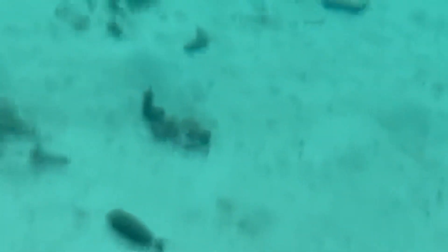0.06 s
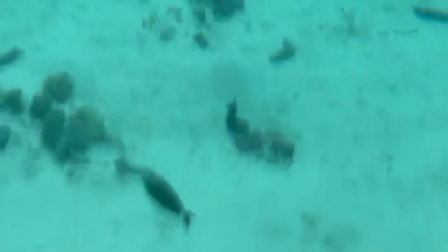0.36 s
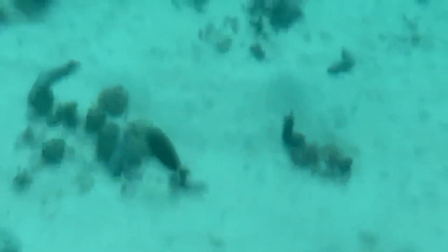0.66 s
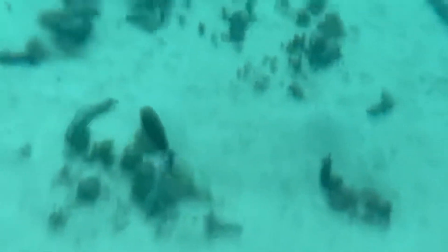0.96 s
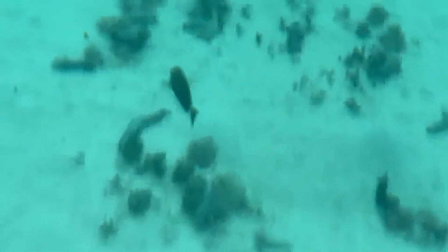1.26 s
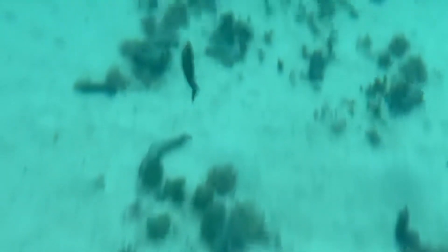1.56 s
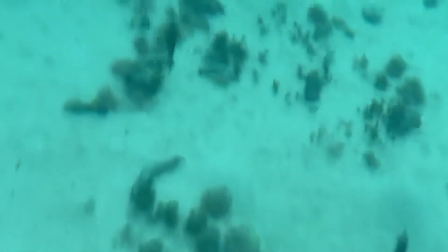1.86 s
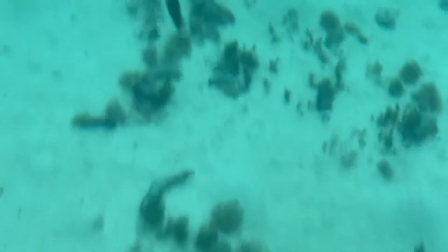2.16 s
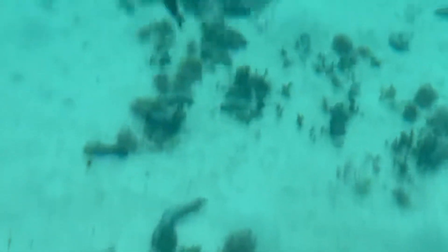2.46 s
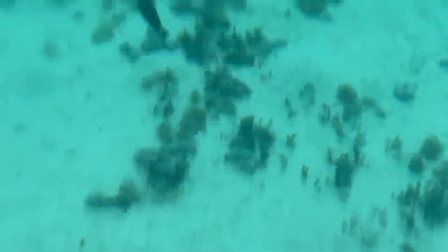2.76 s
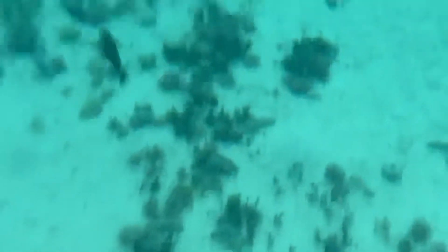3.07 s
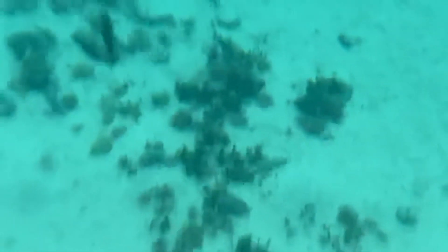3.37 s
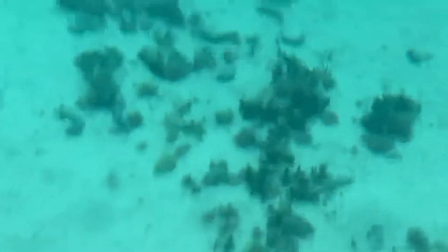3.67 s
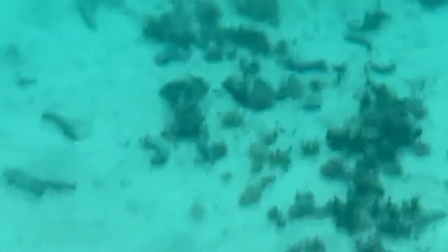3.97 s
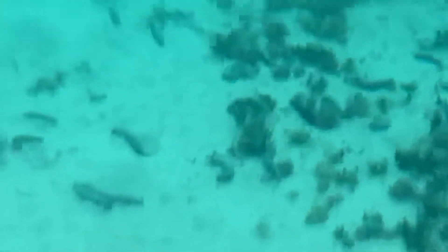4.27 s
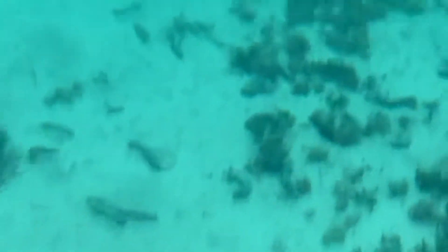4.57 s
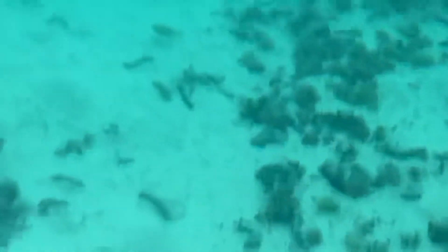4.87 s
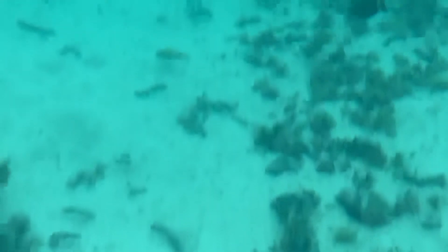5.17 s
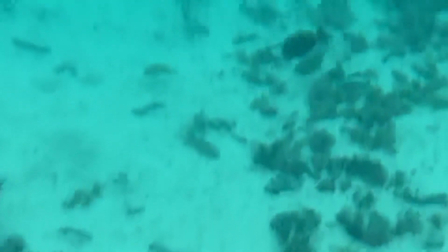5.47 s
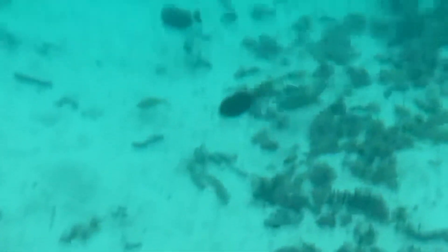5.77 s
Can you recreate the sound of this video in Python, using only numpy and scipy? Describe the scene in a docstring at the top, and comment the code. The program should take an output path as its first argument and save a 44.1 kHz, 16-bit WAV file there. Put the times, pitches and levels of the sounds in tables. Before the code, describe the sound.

Muffled underwater rumble swells twice against a camera case, with sharp little clicks and low gulps of air.

```python
"""Sea water rumbles against a watertight camera case and churns in two long swells.
The case is held just under the surface, above a reef. The surface fizzes faintly and small bubbles ring.
Sharp snaps, as of shrimp and bursting bubbles, tick on the case, and pockets of air throb and gulp."""
import sys
import numpy as np
from scipy import signal
from scipy.fft import rfft, irfft, next_fast_len
from scipy.io import wavfile
from scipy.ndimage import uniform_filter1d, map_coordinates

SR = 44100
rng = np.random.default_rng(int(sys.argv[2]) if len(sys.argv) > 2 else 0)


def bounce(signal):
    """Save signal as a 16-bit WAV file at the path given by the first command-line argument."""
    frames = np.transpose(np.atleast_2d(signal))
    limited = np.clip(frames, -1, 1)
    pcm = np.round(limited * 32767).astype(np.int16)
    wavfile.write(sys.argv[1], SR, pcm)


N = 261513
T = np.arange(N) / SR

# how strongly water flows along the case; 0 dB is a full swell (time [s], level [dB])
FLOW_LEVEL = [(0, -14), (.8, -12), (1.05, -17), (1.25, -13.5), (1.62, -17.5), (1.88, 0), (2.05, -1),
              (2.8, -.5), (3.12, -2), (3.35, -4.5), (3.7, -11), (4.15, -12.5), (4.7, -6.5), (5.03, -11.5),
              (5.35, -4.5), (5.65, 0), (5.93, 0)]
# how loud the deep rumble is (time [s], level [dB])
RUMBLE_LEVEL = [(0, -27), (1.0, -27), (1.3, -29.5), (2.0, -24), (3.0, -25), (3.4, -29.5), (4.4, -23.5),
                (5.35, -32.5), (5.65, -23.5), (5.93, -31.5)]
# how hard the water bubbles (time [s], level [dB])
BUBBLING_LEVEL = [(0, -72.0), (0.8, -63.5), (1.35, -78.0), (1.65, -74.5), (2.0, -66.5), (2.6, -69.5),
                  (3.5, -59.5), (3.75, -68), (4.65, -59), (5.05, -65.5), (5.45, -64), (5.93, -63)]
# brief swishes of the broken surface (time [s], hold [s], level [dB])
SURFACE_SWISHES = [(0, .05, -78), (0.205, .08, -78.5), (0.343, .04, -77), (.68, .15, -76.5),
                   (1.06, .22, -82), (1.5, .18, -81), (1.949, 0.092, -75), (2.135, .07, -77.5),
                   (2.722, .33, -79), (3.165, .2, -73.5), (3.401, .17, -80.5), (4.022, .13, -82.5),
                   (4.369, .05, -83), (4.53, .24, -73), (4.961, .13, -81), (5.592, .14, -77),
                   (5.878, .06, -71.5)]
# the nearest snaps (time [s], crack level [dB], pitch [Hz], knock level above the ring [dB])
NEAR_SNAPS = [(0.0341, -42.5, 5385, -1), (0.2145, -47.5, 4000, 7), (0.3441, -43, 2350, 12.5),
              (0.5517, -46.5, 3850, 12.5), (0.8188, -45, 5160, 3), (0.9315, -44.5, 3850, 10),
              (1.067, -44.5, 2540, -12), (1.1451, -37, 2215, 10), (1.1784, -53, 2400, 1),
              (1.6305, -41, 4456, -3), (1.6413, -41, 4960, 4), (1.6534, -37.5, 5430, 1),
              (1.6834, -44.5, 3430, 10), (1.949, -37.5, 2906, 4.5), (2.023, -38, 5140, 4),
              (2.2627, -49.5, 2230, 9), (2.5236, -45, 5980, 7), (2.592, -43, 3610, 0),
              (2.6208, -38.5, 3090, 0), (2.6351, -39, 1850, 0.5), (2.7576, -46.5, 3200, 3),
              (2.88, -41.5, 4860, 10), (2.9177, -38, 1810, -5), (3.045, -46, 2200, 8),
              (3.1301, -43, 3690, 2), (3.2998, -33.5, 3570, 12.5), (3.4047, -45.5, 4010, 6),
              (3.4222, -42.5, 5880, -1.5), (3.4876, -37, 1880, 1), (4.023, -38.5, 1780, -0.5),
              (4.2151, -39, 1710, 14), (4.6408, -39, 1905, -3), (4.812, -36, 5800, 0.5),
              (4.9663, -48, 1650, 1), (4.9805, -42.5, 1670, 17), (5.0469, -49, 2440, -4.5),
              (5.229, -47, 1630, 19), (5.594, -39, 3140, 0), (5.673, -39, 5830, 0)]
# notes the case rings at (pitch [Hz], level [dB], time to fade 60 dB [s], right side's lag [radians])
CASE_NOTES = [(537, -10, 0.012, 0.35), (1050, -0.5, 0.0084, 1.8), (1410, -6, 0.016, 4.3),
              (1820, -5, 0.011, 4.8), (2290, -4.5, 0.012, 5.2)]
# the clearest pockets and bubbles of air (time [s], peak level [dB], settled pitch [Hz], life [s])
AIR_POCKETS = [(0.345, -20.5, 199, 0.0084), (0.349, -8.5, 88, 0.012), (0.593, -14, 66.4, 0.042),
               (0.77, -7, 73, 0.017), (0.806, -12.5, 73, 0.011), (0.818, -57, 873, .022),
               (0.918, -8, 50, 0.026), (1.149, -8, 113.2, 0.014), (1.859, -13.5, 111, 0.068),
               (2.189, -12.5, 74, 0.044), (2.807, -5.5, 74.6, .018), (3.168, -1, 135.3, 0.035),
               (3.178, -26.5, 375, 0.022), (3.19, -11.5, 134, 0.15), (3.225, -31.5, 346, .08),
               (3.341, -54, 1670, 0.014), (3.361, -12, 160, 0.076), (3.574, -54.5, 923, .018),
               (3.835, -54, 865, 0.024), (4.367, -8, 103, 0.026), (4.506, -24, 255, 0.029),
               (4.512, -6.5, 132, 0.013), (4.519, -12, 87.8, .05), (4.582, -36, 370, 0.02),
               (4.593, -25.5, 265.8, 0.067), (4.678, -3, 157, 0.036), (4.713, -6, 154.5, 0.048),
               (5.059, -11, 150.4, 0.017), (5.128, -11.5, 112.8, 0.058), (5.346, -13.5, 127, 0.052),
               (5.359, -25, 258.6, 0.029)]

# the tone of each sound, from bass to treble (frequency [Hz], level [dB])
RUMBLE_TONE = [(15, -35.5), (28, -18), (43, -2.5), (65, -0.5), (90, -7.5), (120, -16), (200, -28),
               (300, -42), (600, -90.5)]  # water pressing on the case
CHURN_TONE = [(50, -25.5), (90, -15.5), (120, -6), (152, -0.5), (185, -4.5), (225, -9.5), (270, -21.5),
              (330, -28.5), (410, -45), (600, -56), (1200, -100)]  # churning water
HUM_TONE = [(300, -32.5), (420, -21), (475, 3.5), (525, 0.5), (580, 0.5), (625, -5.5), (690, -20),
            (900, -33), (1300, -61)]  # air inside the case
WALL_TONE = [(600, -22.5), (800, -7.5), (1050, -0.5), (1230, 6), (1350, -6), (1480, 3), (1650, -14),
             (2400, -22.5), (4000, -42)]  # rocking walls
WASH_TONE = [(400, -25), (650, 0.5), (900, -1), (1050, -12.5), (1500, -18.5), (3000, -46)]  # water around the bubbles
FIZZ_TONE = [(700, -17), (1500, -5.5), (2300, -2.5), (3000, -6), (5000, -6.5), (6300, -10.5), (7300, -17),
             (10000, -12.5), (11800, -21.5), (13000, -15.5), (16000, -22)]  # the broken surface
CRACK_TONE = [(500, -5.5), (1500, 0.5), (2900, -4), (3700, 2), (5500, 0), (7300, -8.5), (9500, 0),
              (11800, -12), (13000, -3.5), (16000, -14)]  # the crack of a snap
BUZZ_TONE = [(250, -52.5), (400, -3.5), (520, -7), (690, 11), (900, -2), (1180, -9), (1330, -21),
             (2000, -46)]  # a wall hitting its stops


def amp(db):
    """Decibels to gain."""
    return 10 ** (np.asarray(db) / 20)


def unit(x):
    """Scale to an average (rms) level of 1."""
    return x / np.sqrt(np.mean(x ** 2) + 1e-20)


def curves(rows):
    """One value per sample for each column after the time."""
    s, *cols = np.transpose(rows)
    return [np.interp(T, s, c) for c in cols]


def wobble(rate):
    """A smooth random curve through rate points a second."""
    return map_coordinates(rng.standard_normal(int(N * rate / SR) + 4), [T * rate])


def filtered(x, response):
    """Scale and shift each frequency in x as response says."""
    m = next_fast_len(N + SR // 2)
    return irfft(rfft(x, m) * response(np.fft.rfftfreq(m, 1 / SR)), m)[..., :N]


def coloured(x, points):
    """Shape the bass and treble of x with a tone table."""
    f, db = np.transpose(points)
    return filtered(x, lambda hz: amp(np.interp(np.log(hz + 1), np.log(f), db)))


def noise(points):
    """Noise of level 1, shaped by a tone table."""
    return unit(coloured(rng.standard_normal(N), points))


def even(x, span):
    """Noise with its level evened out over span seconds."""
    return unit(x / np.sqrt(np.abs(uniform_filter1d(x ** 2, int(span * SR) + 1)) + 1e-6))


def ports(x, right_db, lag):
    """One sound at two microphone openings: the right is right_db louder and lag radians behind."""
    turn = np.exp(.5j * lag)
    return np.array([filtered(x, lambda hz: turn) * amp(-right_db / 2),
                     filtered(x, lambda hz: 1 / turn) * amp(right_db / 2)])


def add(track, s, sound):
    """Mix a sound in at time s."""
    part = track[..., max(0, round(s * SR)):][..., :sound.shape[-1]]
    part += sound[..., :part.shape[-1]]


def water():
    """Flow presses on the case; as it churns, the air inside hums and the walls rock the microphones."""
    flow_db, = curves(FLOW_LEVEL)
    rumble_db, = curves(RUMBLE_LEVEL)
    rumble = amp(rumble_db + 2.5 * wobble(9)) * even(noise(RUMBLE_TONE), span=0.11)
    churn = amp(-15.5 + 0.99 * flow_db + 2.3 * wobble(14)) * even(noise(CHURN_TONE), span=.1)
    case_gain = amp(-46 + 1.18 * flow_db + 0.97 * wobble(8.3))
    # the hollow hum comes forward as the churning grows
    hum = case_gain * amp(0.14 * (flow_db - np.mean(flow_db))) * even(noise(HUM_TONE), span=0.26)
    walls = case_gain * amp(-13.5) * noise(WALL_TONE)
    return (ports(rumble, right_db=0.66, lag=-.08) + ports(churn, right_db=3.5, lag=0.051)
            + ports(hum, right_db=9.0, lag=1.0) + ports(walls, right_db=-2, lag=2.54))


def swish_level(calm_db=-88, rise_s=0.023, fall_s=0.024):
    """How hard the surface fizzes, in dB: each swish rises quickly, holds and dies back to calm."""
    power = amp(calm_db) ** 2
    for start, hold, db in SURFACE_SWISHES:
        rise = np.clip((T - start) / rise_s, 0, 1)
        fall = np.exp(-np.maximum(T - start - hold, 0) / fall_s)
        power = power + (amp(db) * rise * fall) ** 2
    return 10 * np.log10(power)


def bubbles(count, hz, octaves, cycles):
    """Bubbles ring at random times: each is a fading tone that rises a little in pitch."""
    out, t = np.zeros(N), np.arange(SR // 12) / SR
    for when, pitch, strength in rng.random((count, 3)):
        bubble_hz = hz * 2 ** (octaves * (2 * pitch - 1))
        age = t * bubble_hz / cycles
        shape = (1 - np.exp(-4 * age)) * np.exp(-age)
        glide = 1 + 0.0067 * np.minimum(age, 4)
        add(out, when * N / SR, amp(20 * strength) * shape * np.sin(2 * np.pi * bubble_hz * t * glide))
    return unit(out)


def froth(fizz_db):
    """Bubbles of three sizes ring in a soft wash of water, and the broken surface fizzes."""
    bubble_db = curves(BUBBLING_LEVEL)[0] + 1.3 * wobble(14)
    wash = amp(bubble_db + 1.5) * noise(WASH_TONE)
    large = amp(bubble_db + 9.0) * bubbles(count=110, hz=337, octaves=.35, cycles=2.8)
    medium = amp(bubble_db - 1.0) * bubbles(count=260, hz=803, octaves=0.33, cycles=7.6)
    # the smallest bubbles are loudest when the water both bubbles and fizzes
    small = amp((bubble_db + fizz_db) / 2 - 4) * bubbles(count=320, hz=2060, octaves=.3, cycles=7.4)
    flutter_db = 2.0 * wobble(60) + 2.6 * wobble(700)
    fizz = amp(fizz_db + 8.0 + flutter_db) * np.array([noise(FIZZ_TONE), noise(FIZZ_TONE)])
    return (ports(wash + medium, right_db=1.0, lag=1.8) + ports(large, right_db=6.5, lag=.3)
            + ports(small, right_db=0, lag=-0.86) + fizz)


def case_ring(t):
    """A struck case rings with a few short notes, a little different on every hit."""
    ring = 0
    for hz, db, fade_s, lag in CASE_NOTES:
        fade = amp(db + rng.normal(0, 1.9) - 60 * t / fade_s)
        phase = 2 * np.pi * hz * rng.normal(1, 0.074) * t
        ring = ring + fade * np.sin(phase - np.array([[0], [lag]]))
    return ring


def snaps(fizz_db, far_count, faint_db, range_db):
    """Each snap is a brief crack with its own pitch that knocks the case and sets it ringing."""
    cracks, rings, t = np.zeros((2, N)), np.zeros((2, N)), np.arange(SR // 25) / SR
    # far snaps are mostly faint, and crowd together when the surface fizzes
    crowd = np.cumsum(amp(fizz_db / 2))
    far = [(np.interp(when, crowd / crowd[-1], T), faint_db + range_db * size ** 2,
            3200 + 3000 * pitch, 0) for when, size, pitch in rng.random((far_count, 3))]
    onset = 1 - np.exp(-t / 0.00054)
    low_high_hz = [2700, 3400]
    for start, crack_db, pitch_hz, knock_db in list(NEAR_SNAPS) + far:
        # a low snap has a duller crack and rings the case harder
        treble_cut = signal.butter(1, min(2.6 * pitch_hz, SR / 3), fs=SR)
        ring_db = crack_db + np.interp(pitch_hz, low_high_hz, [-6, -27])
        hiss = signal.lfilter(*treble_cut, rng.standard_normal((2, len(t))))
        crack = hiss * amp(-60 * t / 0.011) * onset
        add(cracks, start, amp(crack_db + 2.5) * crack / np.abs(crack).max())
        # low pings follow the ring's level, high ones the crack's
        ping_db = np.interp(pitch_hz, low_high_hz, [ring_db + 8.5, crack_db - 6])
        ping_phase = 2 * np.pi * pitch_hz * t + rng.normal(0, 0.33, (2, 1))
        ping = amp(ping_db - 60 * t / 0.012) * np.sin(ping_phase)
        knock = amp(knock_db - 60 * t / 0.0061) * np.sin(2 * np.pi * 520 * t) * amp([[-3], [3]])
        case = amp(ring_db + 10.5) * (case_ring(t) + knock)
        add(rings, start + .0004, (ping + case) * onset)
    return coloured(cracks, CRACK_TONE) + rings


def gulps(slack, buzz_db, droop_cycles=.7, rise_share=0.25):
    """Each pocket of air throbs briefly, its pitch sliding down as it changes shape."""
    throbs, t = np.zeros(N), np.arange(SR // 4) / SR
    for start, db, settled_hz, life in AIR_POCKETS:
        hz = settled_hz + droop_cycles / life * np.exp(-t / life)  # short gulps droop the most
        shape = (1 - np.exp(-(t / (rise_share * life)) ** 2)) * np.exp(-(t / life) ** 3)
        add(throbs, start, amp(db) * shape / shape.max() * np.sin(2 * np.pi * np.cumsum(hz) / SR))
    # a throb bigger than the slack drives the case wall against its stops, and it buzzes
    buzz = coloured(throbs - np.clip(throbs, -slack, slack), BUZZ_TONE)
    tremble = 1 + 0.049 * wobble(450)  # the skin of each pocket shakes quickly
    return ports(throbs * tremble + amp(buzz_db) * buzz, right_db=3.0, lag=0)


def scene():
    """Everything reaches the two microphones through the case."""
    fizz_db = swish_level()
    return (water() + gulps(slack=0.65, buzz_db=-5) + froth(fizz_db)
            + snaps(fizz_db, far_count=170, faint_db=-63.5, range_db=13.5))


def record(dry, ceiling=.93, top_hz=15750):
    """The strongest gulps overload the input; the bass leaves a thin whine near a quarter of SR."""
    squashed = dry / (1 + np.abs(dry / ceiling) ** 14) ** (1 / 14)
    whine = amp(-63) * squashed * np.cos(np.pi / 2 * np.arange(N))
    return filtered(squashed + whine, lambda hz: hz < top_hz)


dry = scene()
out = record(dry)
bounce(out)
```